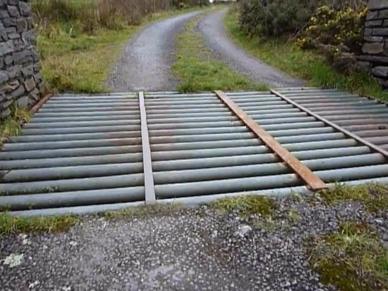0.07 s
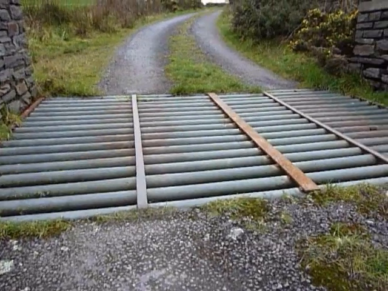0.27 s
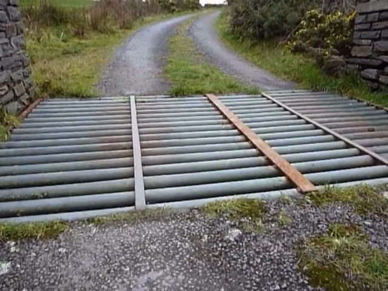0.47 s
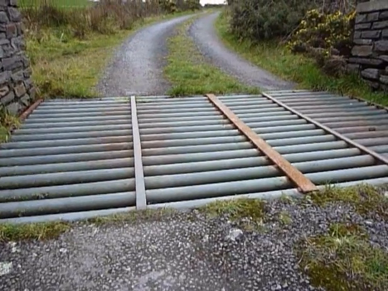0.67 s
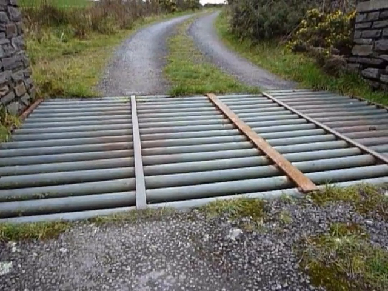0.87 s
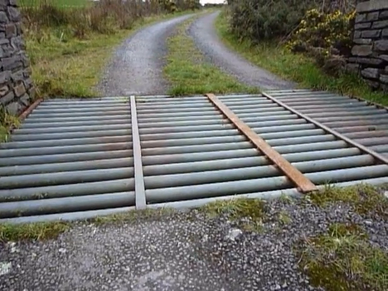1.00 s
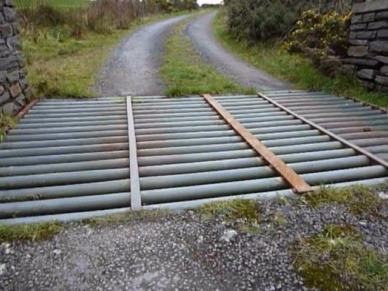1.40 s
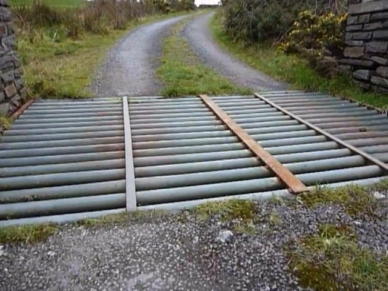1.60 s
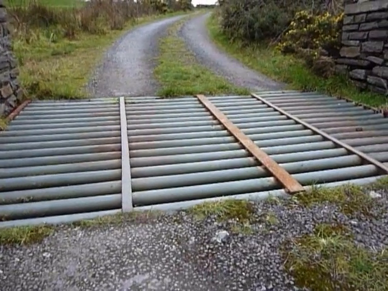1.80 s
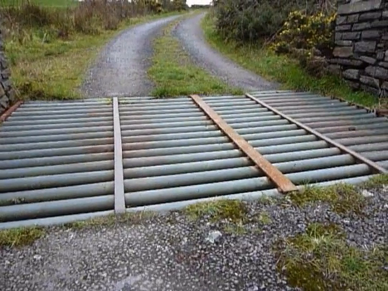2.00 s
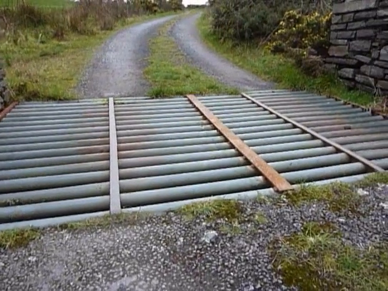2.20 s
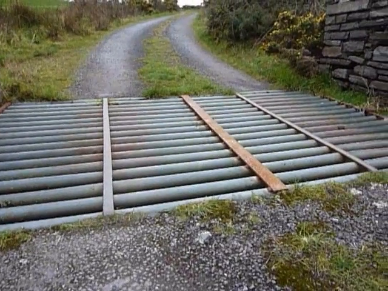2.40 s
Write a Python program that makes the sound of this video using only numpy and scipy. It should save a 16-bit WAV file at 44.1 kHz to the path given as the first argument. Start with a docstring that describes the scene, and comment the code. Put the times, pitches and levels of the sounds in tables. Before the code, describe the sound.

Rapid, low frog croaking swells outdoors, with faint wind and hiss behind it.

```python
"""Low frog-like croaking beside a country track: a rapid train of hollow two-beat pulses near 480 Hz.
The beats start hoarse and apart, close up into clean swelling knocks, then split again as a lower voice joins.
A faint echo follows; behind it all are light wind and a steady hiss."""
import sys
import numpy as np
from scipy import signal
from scipy.fft import rfft, irfft, next_fast_len
from scipy.io import wavfile
from scipy.ndimage import map_coordinates

SR = 44100
rng = np.random.default_rng(int(sys.argv[2]) if len(sys.argv) > 2 else 0)


def to_wav(s):
    """Save 16-bit WAV."""
    ch = np.atleast_2d(s).T  # columns
    pcm = np.round(np.clip(ch, -1, 1) * 32767)  # PCM
    wavfile.write(sys.argv[1], SR, pcm.astype(np.int16))


N = 112454

# croak pulses: (s, level dB, pitch Hz, gap to the second beat s, its level dB, its pitch Hz)
CROAKS = [(0.0059, -42.3, 461.0, 0.0136, -46.1, 520.0), (0.0298, -41.1, 392.0, 0.0071, -40.4, 424.0),
          (0.0617, -38.5, 469.0, 0.0092, -38.2, 437.0), (0.1033, -37.2, 436.0, 0.0117, -38.5, 459.0),
          (0.1103, -45.4, 458.0, 0.0087, -43.8, 460.0), (0.13, -40.9, 360.0, 0.0103, -39.4, 407.0),
          (0.162, -37.7, 590.0, 0.005, -34.9, 454.0), (0.22, -41.1, 461.0, 0.0165, -40.3, 502.0),
          (0.2871, -31.1, 441.0, 0.0058, -37.8, 450.0), (0.3212, -38.1, 455.0, 0.015, -38.8, 513.0),
          (0.3319, -32.6, 382.0, 0.0106, -35.2, 520.0), (0.371, -33, 375, 0.018, -32, 495),
          (0.4177, -32.6, 368.0, 0.0154, -34.6, 504.0), (0.428, -35.0, 422.0, 0.0087, -38.1, 454.0),
          (0.4595, -30.6, 377.0, 0.0177, -32.3, 500.0), (0.472, -35.8, 379.0, 0.0123, -41.6, 439.0),
          (0.4957, -29.9, 375.0, 0.0247, -33.0, 519.0), (0.5057, -38.3, 378.0, 0.012, -36.0, 490.0),
          (0.5311, -27.8, 390.0, 0.0098, -37.5, 380.0), (0.5639, -30.7, 388.0, 0.008, -30.6, 422.0),
          (0.6038, -27.4, 450.0, 0.01, -29.6, 466.0), (0.6423, -27.7, 451.0, 0.0104, -29.3, 500.0),
          (0.6814, -28.1, 457.0, 0.0166, -30.7, 511.0), (0.6881, -36.2, 441.0, 0.004, -33.9, 542.0),
          (0.7216, -29.1, 456.0, 0.0183, -29.9, 491.0), (0.7305, -38.2, 540.0, 0.0108, -34.9, 590.0),
          (0.7641, -28.8, 473.0, 0.0104, -35.9, 522.0), (0.8094, -27.8, 485.0, 0.0104, -41.5, 530.0),
          (0.8578, -27.8, 492.0, 0.0068, -39.3, 545.0), (0.9098, -29.1, 508.0, 0.0045, -37.3, 519.0),
          (0.9626, -28.8, 504.0, 0.0044, -35.9, 503.0), (1.0171, -28.1, 491.0, 0.0046, -37.6, 512.0),
          (1.0722, -28.4, 484.0, 0.0042, -34.9, 471.0), (1.1295, -28.9, 499.0, 0.0042, -34.2, 489.0),
          (1.1852, -27.1, 498.0, 0.0042, -33.2, 488.0), (1.2356, -27.8, 490.0, 0.0042, -32.6, 496.0),
          (1.2907, -29.5, 493.0, 0.0042, -33.4, 495.0), (1.3391, -25.8, 488.0, 0.0042, -31.1, 491.0),
          (1.3868, -25.6, 497.0, 0.0041, -29.2, 483.0), (1.4352, -25.1, 487.0, 0.0041, -29.0, 478.0),
          (1.482, -24.4, 493.0, 0.0041, -27.8, 478.0), (1.5261, -22.1, 494.0, 0.0041, -27.0, 482.0),
          (1.568, -21.4, 497.0, 0.0041, -25.3, 486.0), (1.6115, -21.7, 496.0, 0.0041, -25.0, 483.0),
          (1.656, -21.0, 493.0, 0.0041, -25.3, 480.0), (1.7, -20.7, 499.0, 0.0041, -23.8, 483.0),
          (1.7448, -22.6, 498.0, 0.0041, -24.2, 472.0), (1.792, -20.8, 487.0, 0.0041, -24.7, 461.0),
          (1.843, -22.6, 475.0, 0.004, -28.3, 445.0), (1.8744, -35.3, 401.0, 0.0133, -32.5, 523.0),
          (1.8908, -27.1, 455.0, 0.0042, -28.1, 441.0), (1.9308, -31.3, 429.0, 0.0086, -34.3, 477.0),
          (1.9508, -25.8, 481.0, 0.006, -31.2, 425.0), (1.9819, -28, 402.0, 0.0073, -31.3, 504.0),
          (2.0066, -24.3, 500.0, 0.0042, -26.7, 463.0), (2.0279, -28.4, 416.0, 0.0089, -30.7, 482.0),
          (2.0639, -24.4, 489.0, 0.0041, -30.4, 462.0), (2.0748, -26.8, 417.0, 0.0088, -29.7, 472.0),
          (2.079, -45.5, 590.0, 0.0078, -37.6, 393.0), (2.1171, -24.6, 506.0, 0.0103, -27.5, 460.0),
          (2.1219, -32.8, 590.0, 0.0086, -37.8, 380.0), (2.1639, -27.8, 421.0, 0.0056, -26.5, 464.0),
          (2.2053, -26.4, 423.0, 0.0087, -28.4, 479.0), (2.2449, -29.5, 416.0, 0.009, -33.6, 488.0)]  # fixed
RISE_S, SHAPE = .003686, 2.28  # fixed
UPPER_HZ, UPPER_RISE_S = 735, 0.0027  # the upper resonance
# hoarseness: (s, rasp dB re each beat)
RASP_DB = [(0, -8.5), (.17, -9), (.35, -13.5), (.6, -16), (.8, -17), (1.0, -35), (1.8, -28.5), (1.95, -21.5), (2.25, -16.5)]
RASP_RISE_S, RASP_SHAPE = 0.0026, 1
# colour of the rasp: (Hz, dB)
RASP = [(200, -24), (310, 2.5), (450, 2), (600, -1.5), (750, 1), (870, -8.5), (1050, -10.5), (1300, -22), (3000, -38)]
ECHO_S, ECHO_DB = 0.023, -18  # a nearby wall
TAIL_DB, TAIL_T60_S = -16.5, 0.28  # scatter from banks and bushes
# wind and hiss: (Hz, dB per Hz)
WIND = [(18, -26), (28, -13), (45, -10), (65, -6.5), (110, -7), (180, -3), (260, -5), (420, -4.5), (700, -8.5), (1200, -23.5), (2000, -44)]
WIND_DB, WIND_SWAY_DB = -53.5, 0.5
HISS = [(300, -4), (1000, 1.5), (2000, -3), (4000, -7), (7200, -10), (8100, -18.5), (8900, -39.5), (13200, -41.5), (14100, -19.5), (15500, -12.5)]
HISS_DB = -56
# narrow dips high in the spectrum: (Hz, width Hz)
NOTCHES = [(5440, 210), (7700, 170), (14400, 200)]
TOP_HZ = 15750  # fixed
# level of the upper resonance: (s, dB re each beat)
UPPER_DB = [(0, -21), (.16, -10), (.3, -21.5), (.58, -16), (.74, -13), (.85, -29.5), (1.42, -33), (1.55, -19.5), (1.8, -17.5), (2.0, -22), (2.17, -10), (2.25, -24)]
LOW_CUT_HZ = 238  # a small body radiates little bass
WHINE_HZ = 3934  # fixed
WHINE_DB = -78  # a thin electronic whine
# level of a faint crackle under the early part of the call: (s, dB)
CRACKLE_DB = [(0, -60.5), (.13, -56.5), (.2, -65), (.3, -63.5), (.5, -69), (.8, -79.5)]
CRACKLE_RATE, CRACKLE_DEPTH_DB = 140, 6  # flutters a second; their depth
# colour of the crackle: (Hz, dB)
CRACKLE = [(550, -18.5), (800, 1), (1100, -2), (1500, -7.5), (2500, -26)]


def amp(db):
    """Decibels to gain."""
    return 10 ** (np.asarray(db) / 20)


def unit(x):
    """Scale to rms 1."""
    return x / np.sqrt(np.mean(x ** 2) + 1e-20)


def filtered(x, response):
    """x times a response of frequency."""
    m = next_fast_len(N + 8192)  # fixed
    return irfft(rfft(x, m) * response(np.fft.rfftfreq(m, 1 / SR)), m)[:N]


def noise(spectrum):
    """Noise of rms 1 with the colour of (Hz, dB) points."""
    f, db = np.transpose(spectrum)
    colour = lambda hz: amp(np.interp(np.log(hz + 1), np.log(f + 1), db, left=-120, right=-120))  # fixed
    return unit(filtered(rng.standard_normal(N), colour))


def wobble(rate):
    """A smooth random curve, rate knots a second."""
    return map_coordinates(rng.standard_normal(int(N * rate / SR) + 4), [np.arange(N) * rate / SR])


def swell(t, rise, shape):
    """Rises from 0 to 1 at t = rise, then dies away."""
    u = np.maximum(t, 0) / rise
    return (u * np.exp(1 - u)) ** shape


def croaks():
    """Each beat rings a main and an upper resonance and lets out a puff of rasp."""
    main, upper, puffs = np.zeros((3, N + SR))
    for s, db, hz, gap, second_db, second_hz in CROAKS:
        for start, level_db, pitch in (s, db, hz), (s + gap, second_db, second_hz):
            i = max(int(start * SR), 0)
            t = (i + np.arange(SR // 20)) / SR - start
            span, size = slice(i, i + len(t)), amp(level_db)
            main[span] += size * swell(t, RISE_S, SHAPE) * np.sin(2 * np.pi * pitch * t)
            upper[span] += size * swell(t, UPPER_RISE_S, SHAPE) * np.sin(2 * np.pi * UPPER_HZ * t)
            puffs[span] += size * swell(t, RASP_RISE_S, RASP_SHAPE)
    voice = main[:N] + level(UPPER_DB) * upper[:N] + level(RASP_DB) * puffs[:N] * noise(RASP)
    return filtered(voice, lambda hz: hz ** 6 / (hz ** 6 + LOW_CUT_HZ ** 6))  # fixed


def surroundings(x):
    """One wall echo and a short scattered tail that changes from moment to moment."""
    echo = filtered(x, lambda hz: np.exp(-2j * np.pi * hz * ECHO_S))
    t, tail = np.arange(SR // 4) / SR, np.zeros(N)
    hop = SR // 10
    for centre in range(0, N + hop, hop):
        part = x * np.maximum(1 - abs(np.arange(N) - centre) / hop, 0)
        scatter = rng.standard_normal(len(t)) * np.exp(-np.log(1000) * t / TAIL_T60_S)
        tail += signal.oaconvolve(part, scatter / np.linalg.norm(scatter))[:N]
    return amp(ECHO_DB) * echo + amp(TAIL_DB) * tail


def background():
    """Light wind, even hiss and a thin whine."""
    wind = amp(WIND_DB + WIND_SWAY_DB * wobble(5)) * noise(WIND)
    whine = amp(WHINE_DB) * unit(np.sin(2 * np.pi * WHINE_HZ * np.arange(N) / SR))
    return wind + amp(HISS_DB) * noise(HISS) + whine


def level(points):
    """A gain for each sample from (s, dB) points."""
    return amp(np.interp(np.arange(N) / SR, *np.transpose(points)))


def crackle():
    """A soft, uneven crackle that fades as the pulses clear."""
    return level(CRACKLE_DB) * unit(amp(CRACKLE_DEPTH_DB * wobble(CRACKLE_RATE)) * noise(CRACKLE))


def scene():
    """The croaking in the open air."""
    voice = croaks()
    return (voice + surroundings(voice) + background() + crackle())[None]


def record(dry):
    """A mono microphone, then a few narrow dips and a band limit."""
    dips = lambda hz: np.prod([(hz - c) ** 2 / ((hz - c) ** 2 + (w / 2) ** 2) for c, w in NOTCHES], axis=0)
    return filtered(dry[0], lambda hz: dips(hz) * (hz < TOP_HZ))[None]


dry = scene()
out = record(dry)
to_wav(out)
```